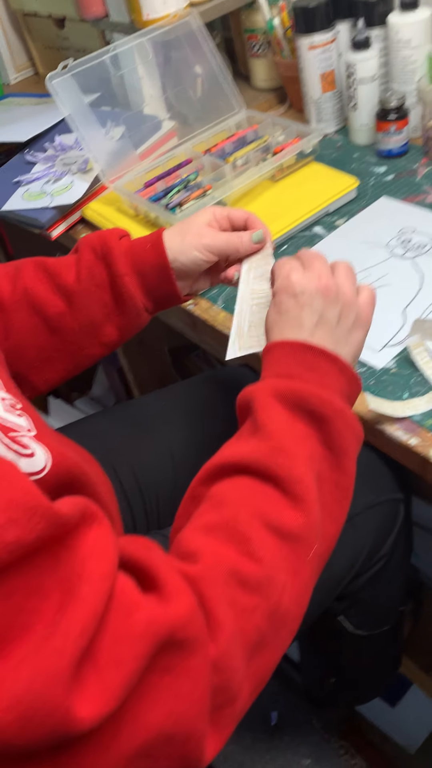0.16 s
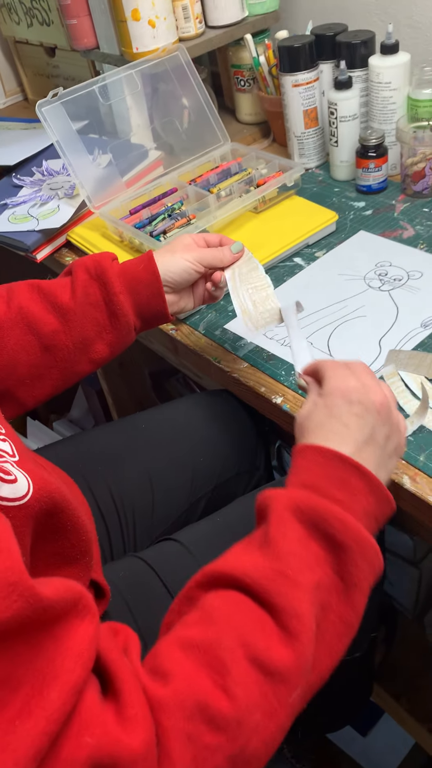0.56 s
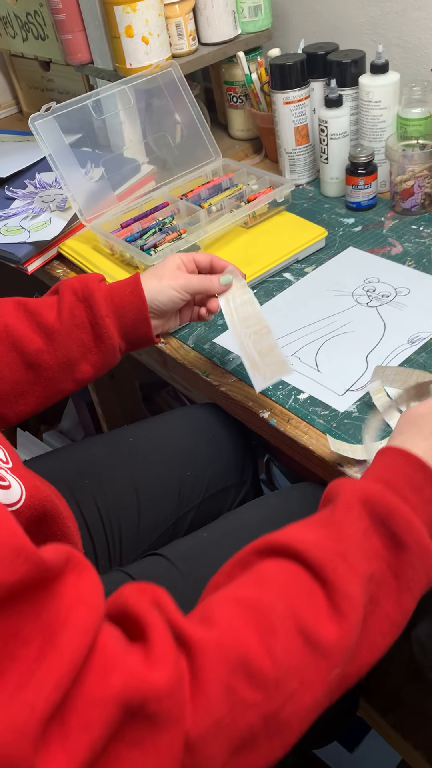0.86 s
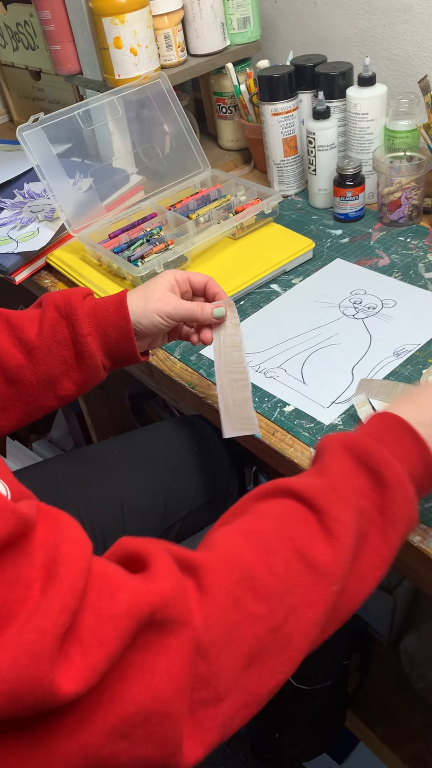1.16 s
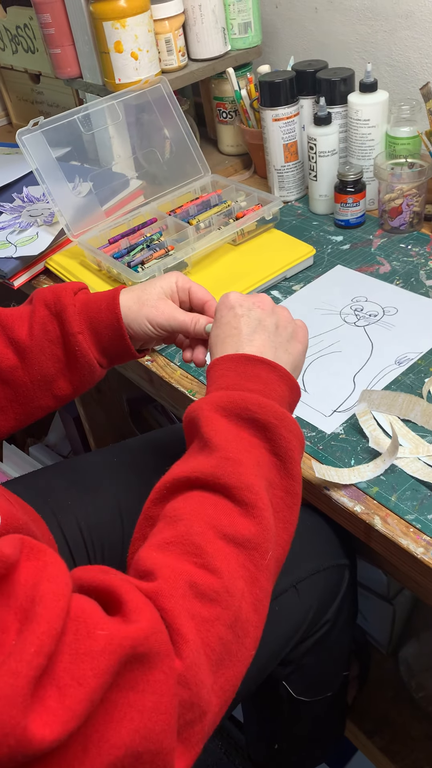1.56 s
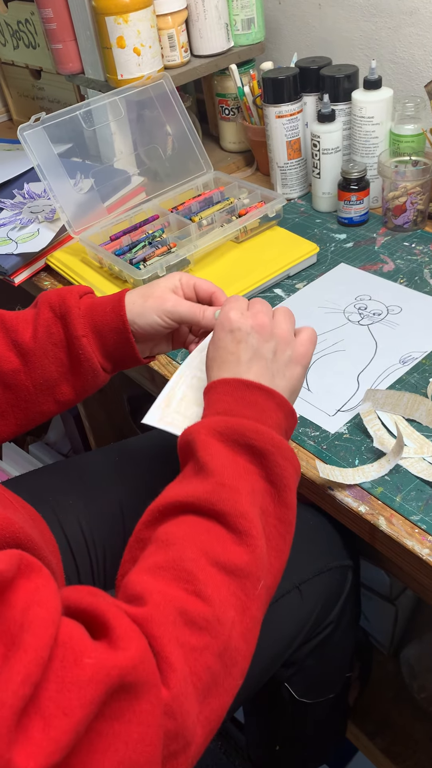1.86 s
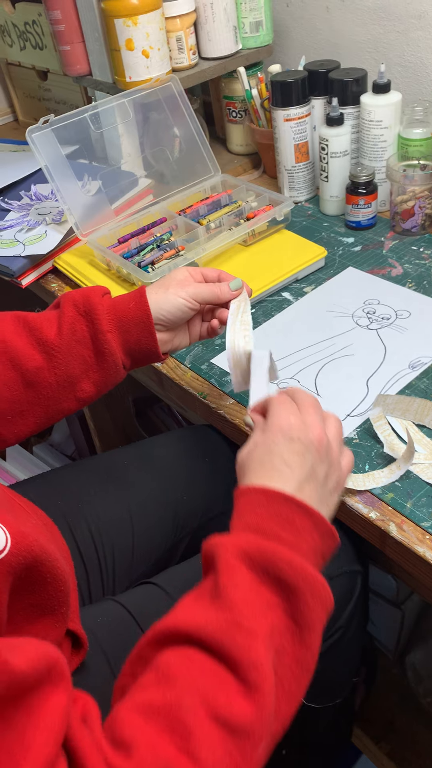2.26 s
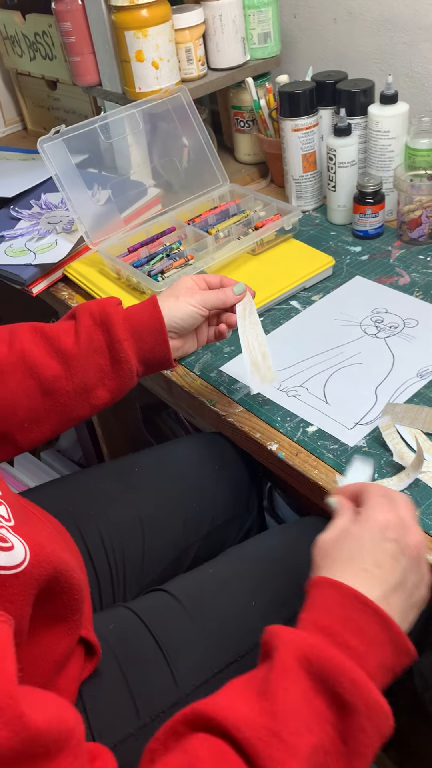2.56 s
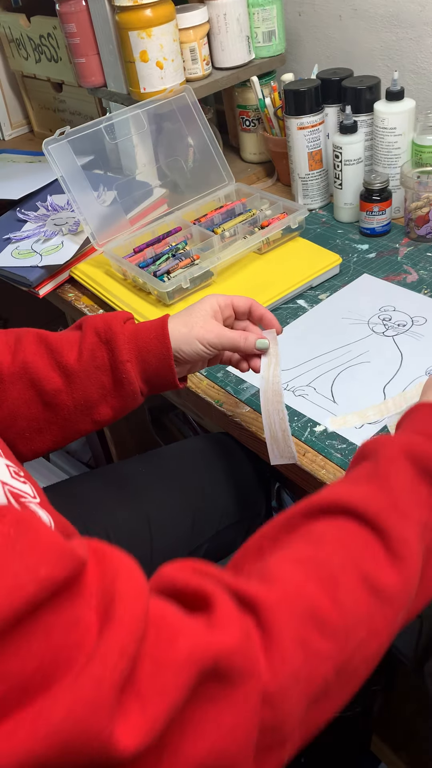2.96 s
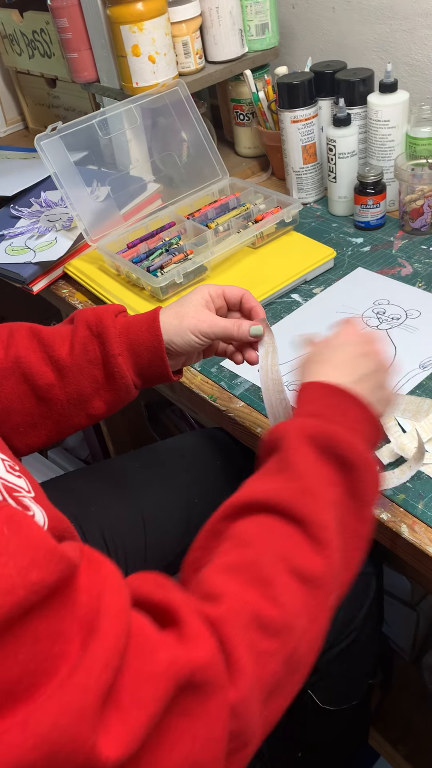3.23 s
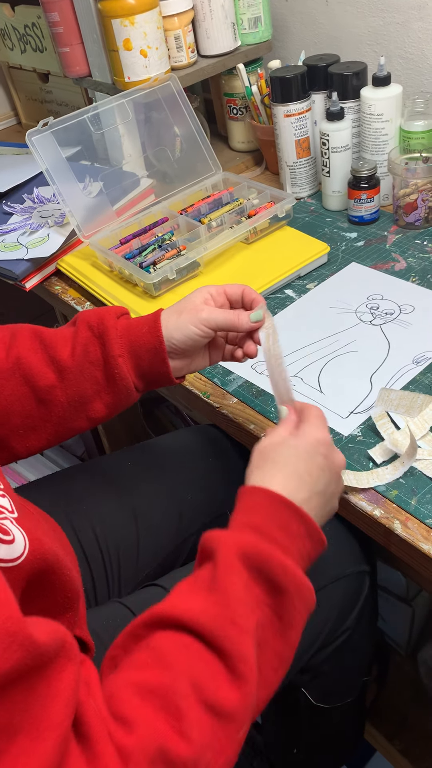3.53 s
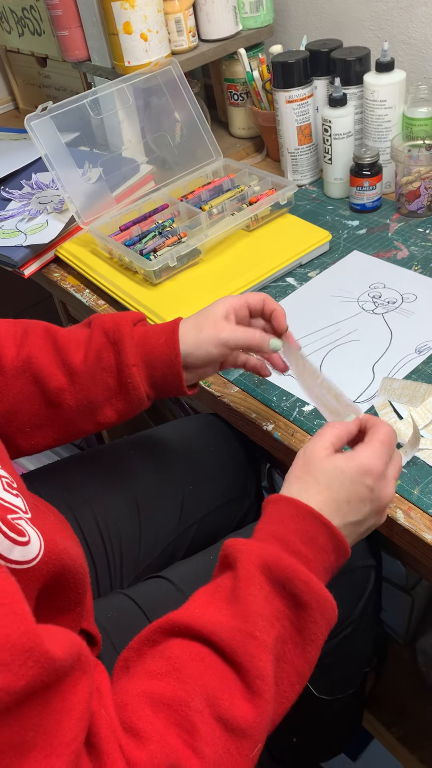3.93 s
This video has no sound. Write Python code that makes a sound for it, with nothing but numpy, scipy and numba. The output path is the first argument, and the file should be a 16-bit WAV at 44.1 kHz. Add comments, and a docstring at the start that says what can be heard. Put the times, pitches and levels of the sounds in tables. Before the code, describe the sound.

Paper is torn by hand into two long strips, two crisp crackling rips with soft rustling and faint handling between and after.

```python
"""Paper rips crisply, twice, as two long strips are torn by hand at a craft table in a small room.
Fibres snap in clumps (random clicks, coloured) along each tear and shake sheet and strip.
Between and after the tears, creases, soft bumps, sliding and rustling tell of strips being handled.
Sleeves brush about (banded noise) over a low hum (wavering sine), rumble and hiss (noise)."""
import sys
import numpy as np
from scipy import signal
from scipy.fft import rfft, irfft, next_fast_len
from scipy.io import wavfile
from scipy.ndimage import uniform_filter1d
from numba import njit

SR = 44100
rng = np.random.default_rng(int(sys.argv[2]) if len(sys.argv) > 2 else 0)


def dump(signal):
    """Clip the signal to [-1, 1] and save it as 16-bit WAV at the path in sys.argv[1]."""
    limited = np.clip(np.atleast_2d(signal).T, -1, 1)
    pcm = np.round(limited * 32767).astype(np.int16)
    wavfile.write(sys.argv[1], SR, pcm)


N = 180369
TIME = np.arange(N) / SR
SIZE = 2 * next_fast_len((N + SR) // 2, True)
HZ = np.maximum(np.arange(SIZE // 2 + 1) * SR / SIZE, 1)
CUTOFF_HZ = 15900


def from_db(db):
    """Decibels to gain."""
    return 10 ** (np.asarray(db) / 20)


def rms_one(x):
    """Scale to unit rms."""
    return x / np.sqrt(np.mean(x ** 2) + 1e-20)


def in_time(rows):
    """Each column of a curve at every sample."""
    s, *columns = np.transpose(rows)
    return [np.interp(TIME, s, c) for c in columns]


def at_hz(points):
    """A table joined by straight lines over log frequency."""
    hz, value = np.transpose(points)
    return np.interp(np.log(HZ), np.log(hz), value)


def colour(x, spectrum):
    """Causal (minimum-phase) filter with this spectrum; white noise keeps its rms."""
    cepstrum = irfft(np.log(rms_one(from_db(at_hz(spectrum)))), SIZE)
    cepstrum[1:SIZE // 2] *= 2
    cepstrum[SIZE // 2 + 1:] = 0
    return irfft(rfft(x, SIZE) * np.exp(rfft(cepstrum)), SIZE)[..., :N]


def highpass_or_lowpass(x, order, hz, kind):
    """Butterworth filter."""
    return signal.sosfilt(signal.butter(order, hz, kind, fs=SR, output="sos"), x)


def drift(rate_hz):
    """Smooth chance of unit rms with about rate_hz turns a second."""
    r = np.exp(-40 * np.pi * rate_hz / SR)  # runs at SR / 20
    noise = rng.standard_normal(N // 20 + 2002)
    slow = signal.lfilter([1], [1, -2 * r, r * r], noise)[2000:]
    return np.interp(np.arange(N) / 20, np.arange(len(slow)), rms_one(slow))


def steady(x):
    """Unit rms over every few hundredths of a second; finer grain stays."""
    return x / np.sqrt(np.maximum(uniform_filter1d(x ** 2, size=1500), 1e-9))


def crackle(per_s, spread_db):
    """Random clicks of either sign and exponentially spread dB level."""
    born = rng.random(N) < per_s / SR
    sizes = from_db(spread_db * np.minimum(rng.exponential(1, N), 4))
    return born * sizes * rng.choice([-1, 1], N)


def burst(start_s, t60_s):
    """An envelope that jumps to one and dies away."""
    start = round(start_s * SR)
    age_s = TIME[:N - start][:round(2 * t60_s * SR)]
    return np.pad(1000. ** (-age_s / t60_s), (start, N - start - len(age_s)))


STOP_S = 0.0044


def stroke(peak_s, rise_s, fall_s, edge_db):
    """Gain of one hand movement: swells from edge_db to full at its fastest moment and sinks back."""
    start, end = peak_s - rise_s, peak_s + fall_s
    moving = np.interp(TIME, [start - STOP_S, start, end, end + STOP_S], [0, 1, 1, 0])
    return moving * from_db(np.interp(TIME, [start, peak_s, end], [edge_db, 0, edge_db]))


def flex(x, depth_db, rate_hz, tilt_db=0, count=13):
    """Bending paper radiates ever different bands; tilt_db per octave leans the treble about 8.5 kHz."""
    centres = np.linspace(np.sqrt(200), np.sqrt(16000), count) ** 2
    spectrum, out = rfft(x, SIZE), 0
    for hz, only in zip(centres, np.eye(count)):
        band = irfft(spectrum * np.interp(HZ, centres, only), SIZE)[:N]
        octaves = np.log2(max(hz, 4000) / 8500) * (hz > 3300)
        out = out + band * from_db(depth_db * drift(rate_hz) + tilt_db * octaves)
    return out


@njit
def moving_band(x, tuning, width):
    """A resonance of unit gain whose centre moves; tuning is tan(pi Hz / SR)."""
    out, band, low = np.zeros(len(x)), 0., 0.
    for i in range(len(x)):
        out[i] = (band + tuning[i] * (x[i] - low)) / (1 + tuning[i] * (tuning[i] + width))
        band, low = 2 * out[i] - band, low + 2 * tuning[i] * out[i]
    return width * out


def lift_band(x, hz, width, lift_db):
    """Resonance gliding along hz raises its band; width is a share of the pitch."""
    tuning = np.tan(np.pi * np.minimum(hz, CUTOFF_HZ) / SR)
    return x + (from_db(lift_db) - 1) * moving_band(x + 1e-18, tuning, width)


# left-right likeness of diffuse sound: pitch_hz, likeness (-1 to 1, clipped)
LEFT_RIGHT_LIKENESS = [(50, 1), (200, 0.78), (450, 0.47), (900, -0.26), (2000, -0.064), (3400, -0.4),
                       (6000, 1), (13800, -1.2)]


def diffuse(pair):
    """Two unrelated signals become the spectra of sound arriving from all sides."""
    alike = np.clip(at_hz(LEFT_RIGHT_LIKENESS), -1, 1)
    mid, side = rfft(pair, SIZE)
    return (np.sqrt(1 + alike) * mid + np.sqrt(1 - alike) * side * [[1], [-1]]) / np.sqrt(2)


# shared course of hum and rumble: time_s, level_db
LOW_LEVEL = [(0.0, -50), (0.03, -53.5), (1.97, -64), (2.06, -57.5), (2.28, -65.5), (2.43, -57),
             (3.01, -58.5), (3.05, -62), (3.6, -61), (3.79, -69.5), (3.87, -56.5), (4.09, -61.5)]
# rumble spectrum: pitch_hz, relative_db
RUMBLE_SPECTRUM = [(15, -46), (30, -35.5), (46, 8), (58, -5), (72, 4.5), (95, -10), (160, -12.5),
                   (400, -35), (2000, -70.5)]
# room hiss spectrum: pitch_hz, relative_db
AIR_SPECTRUM = [(30, -16), (150, 1.5), (350, -2.5), (800, -9.5), (2000, -9), (4000, -22.5), (9000, -35.5),
                (16000, -32)]
HUM_HZ = 47.96


def background(hum_db=-4.0, rumble_db=-2.5, air_db=-72.0):
    """A phase-wavering low sine hum, with diffuse noise as rumble and faint room hiss."""
    level_db, = in_time(LOW_LEVEL)
    hum = np.sqrt(2) * np.sin(2 * np.pi * HUM_HZ * TIME + 0.4 * drift(4.1))
    rumble = from_db(level_db + rumble_db) * colour(rng.standard_normal((2, N)), RUMBLE_SPECTRUM)
    air = from_db(air_db) * colour(rng.standard_normal((2, N)), AIR_SPECTRUM)
    return from_db(level_db + hum_db) * hum + irfft(diffuse(rumble + air), SIZE)[:, :N]


# arm movements: fastest_s, speed_up_s, slow_down_s, level_db
ARM_STROKES = [(0.92, 0.035, 0.12, -62.5), (1.124, 0.043, 0.089, -60), (1.32, 0.14, 0.12, -57.5),
               (1.668, 0.023, 0.022, -62), (1.86, 0.059, 0.48, -62.5), (2.7, 0.022, 0.11, -60.5),
               (2.858, 0.028, 0.047, -61.5), (2.998, 0.027, 0.053, -61), (3.044, 0.0061, 0.029, -66),
               (3.105, 0.044, 0.091, -63), (3.25, 0.039, 0.036, -62), (3.325, 0.017, 0.035, -65.5),
               (3.46, 0.09, 0.11, -62.5), (3.799, 0.13, 0.32, -69)]
# cloth spectrum: pitch_hz, relative_db
SLEEVE_SPECTRUM = [(50, -9.5), (110, -34.5), (170, -0.5), (300, -3.5), (450, -6), (700, -3), (1000, -11.5),
                   (2500, -13.5), (10000, -42)]
ARM_EDGE_DB = -10  # at both ends of a movement


def sleeves(lumps_db=1.15, folds_db=3, count=7):
    """Cloth brushes on all sides; each fold swells in a low band of its own."""
    effort = sum(from_db(db) * stroke(s, rise, fall, ARM_EDGE_DB) for s, rise, fall, db in ARM_STROKES)
    brush = rfft(colour(rng.standard_normal((2, N)), SLEEVE_SPECTRUM), SIZE)
    centres = np.geomspace(130, 1100, count)
    cloth = 0
    for only in np.eye(count):
        fold = irfft(brush * np.interp(HZ, centres, only), SIZE)[:, :N]
        cloth = cloth + fold * from_db(folds_db * drift(22))
    return irfft(diffuse(cloth * effort * from_db(lumps_db * drift(14))), SIZE)[:, :N]


# soft bumps of hand and forearm: start_s, level_db
HAND_BUMPS = [(0.972, -48.5), (1.323, -55), (1.358, -52.5), (1.66, -61), (1.99, -54), (2.021, -62),
              (2.335, -50), (2.409, -51.5), (2.501, -57), (2.693, -45.5), (2.732, -52.5), (2.856, -62),
              (3.09, -61), (3.449, -58.5)]


def bumps(modes=((120, -13, .16), (163, 2, .17), (190, -1, .13), (240, -9, .09)), rise_s=0.0043):
    """Soft blows swell into the low modes of the table: pitch_hz, level_db, t60_s."""
    out = np.zeros(N)
    for s, db in HAND_BUMPS:
        start = round(s * SR)
        age_s = TIME[:N - start][:SR // 2]
        for hz, mode_db, t60_s in modes:
            gain = from_db(db + mode_db + rng.normal(0, 5.1))
            envelope = gain * burst(0, t60_s)[:len(age_s)] * (1 - np.exp(-age_s / rise_s))
            out[start:][:len(age_s)] += envelope * np.sin(2 * np.pi * (hz * age_s + rng.random()))
    return out


# paper drawn through the fingers: fastest_s, speed_up_s, slow_down_s, slide_db, rustle_db
FINGER_SLIDES = [(0.949, 0.098, 0.18, -73, -66), (1.27, 0.16, 0.14, -65, -62),
                 (1.79, 0.076, 0.052, -81, -72), (2.8, 0.066, 0.29, -73, -88),
                 (3.31, 0.027, 0.053, -73, -67.5), (3.41, 0.027, 0.19, -56, -93),
                 (3.586, 0.12, 0.14, -45.5, -55), (3.976, 0.044, 0.037, -55, -63)]
# paper creased or rubbed in the fingers: pitch_hz, relative_db
CREASE_SPECTRUM = [(1500, -33.5), (3300, -4), (4500, 0.5), (6000, 3), (8000, 5), (9500, 2.5), (11000, -0.5),
                   (14000, -4.5), (16000, -15)]
# rustling strip: pitch_hz, relative_db
RUSTLE_SPECTRUM = [(400, -5.5), (1200, -14.5), (1600, 2), (2700, 1), (4300, 4.5), (6000, 4.5),
                   (16000, -26.5)]
SLIDE_EDGE_DB, RUSTLE_FOLLOWS = -20, 0.36  # at both ends of a slide; share of that swing in the rustle


def handling(brighten=0.13, idle_db=-83, neutral_db=-72):
    """Fine-grained sliding, brighter when faster, and rustle; held paper is never quite still."""
    grain = steady(crackle(per_s=23000, spread_db=4.0) * from_db(0.83 * drift(41)))
    slide, rustle = from_db(idle_db), 0
    for s, rise, fall, slide_db, rustle_db in FINGER_SLIDES:
        slide = slide + from_db(slide_db) * stroke(s, rise, fall, SLIDE_EDGE_DB)
        rustle = rustle + from_db(rustle_db) * stroke(s, rise, fall, RUSTLE_FOLLOWS * SLIDE_EDGE_DB)
    paper = slide * colour(grain, CREASE_SPECTRUM) + rustle * colour(grain, RUSTLE_SPECTRUM)
    tilt_db = brighten * (20 * np.log10(slide) - neutral_db)
    return flex(paper, depth_db=3.5, rate_hz=12, tilt_db=tilt_db)


# strips buckling or touching the table: start_s, level_db, crispness_db, t60_s
STRIP_TOUCHES = [(0.761, -57, 5.5, 0.21), (0.919, -55, -20, 0.11), (1.175, -53.5, -2, 0.25),
                 (1.23, -54.5, -9, 0.15), (1.269, -66, 0, 0.39), (1.297, -58.5, -11, 0.32),
                 (1.319, -67, -16, 0.08), (1.352, -50, -9.5, 0.12), (1.513, -78, 6, 0.28),
                 (1.569, -69, 6, 0.28), (1.818, -58, -2.5, 0.28), (1.846, -64, 22, 0.049),
                 (1.876, -72, 27, 0.12), (2.563, -60.5, -1, 0.3), (2.683, -56.5, -13, 0.19),
                 (2.691, -50, -6.5, 0.26), (2.845, -51, -6.5, 0.27), (2.850, -47.5, -14, 0.058),
                 (2.974, -78.5, 14, 0.085), (3.039, -64, 1.5, 0.23), (3.173, -66, -7, 0.23),
                 (3.235, -60.5, -8.5, 0.24), (3.262, -73, 18.5, 0.15), (3.383, -77.5, 14, 0.14),
                 (3.428, -60, -8, 0.1)]
# dull part of a touch: pitch_hz, relative_db
TOUCH_SPECTRUM = [(100, 0.5), (300, 8), (500, -22), (980, 7.5), (1220, 12.5), (1500, 7), (2500, 7),
                  (3400, 9), (4300, 10), (6000, -1.5), (10000, -32.5), (16000, -87)]


def touches(rise_hz=110, uneven_db=1.0):
    """A strip lands or buckles: an uneven flurry of creases, dull on the table, crisp in the fingers."""
    creases = steady(crackle(per_s=1800, spread_db=-1.5) * from_db(uneven_db * drift(110)))
    dull = sum(from_db(db) * burst(s, t60_s) for s, db, _, t60_s in STRIP_TOUCHES)
    crisp = sum(from_db(db + crisp_db) * burst(s, t60_s) for s, db, crisp_db, t60_s in STRIP_TOUCHES)
    # limp paper takes a moment to make full contact
    dull, crisp = highpass_or_lowpass(np.array([dull, crisp]) + 1e-18, 1, rise_hz, "low")
    return colour(dull * creases, TOUCH_SPECTRUM) + colour(crisp * creases, CREASE_SPECTRUM)


# thick fibre bundles giving way: start_s, level_db, ring_hz
BUNDLE_SNAPS = [(0.0402, -15, 8000), (0.0473, -11.5, 7800), (0.0566, -13.5, 7900), (0.0872, -12, 8500),
                (0.1361, -13.5, 8500), (0.1825, -12.5, 9400), (0.1948, -15, 9400), (0.204, -12.5, 9600),
                (0.2126, -11.5, 7800), (0.2224, -6, 8800), (0.2277, -7.5, 7800), (0.245, -15, 8500),
                (0.2602, -10, 8000), (0.2627, -12.5, 8600), (0.2726, -9, 6900), (0.3025, -19.5, 8500),
                (0.4459, -20.5, 7200), (0.5067, -23, 8200), (0.5234, -14.5, 9400), (0.585, -24, 8200),
                (0.745, -12, 8000), (0.756, -17.5, 9900), (1.900, -18, 7500), (1.9225, -12, 6500),
                (1.939, -19, 6500), (1.9588, -15, 7500), (1.966, -9.5, 7500), (1.9762, -12.5, 7500),
                (1.9877, -3.5, 7200), (2.2113, -23, 9800), (2.22, -21, 9300), (2.244, -16, 9300),
                (2.2693, -31, 9000), (2.336, -24, 9200), (2.3935, -14, 9000), (2.4365, -10, 9800),
                (2.4738, -14, 8200), (2.499, -18, 8500), (2.5225, -12.5, 8500), (2.558, -23, 8500)]
# breaking fibres: pitch_hz, relative_db
FIBRE_SPECTRUM = [(1500, -28.5), (3300, -8.5), (4500, 3), (6000, 2.5), (8000, -0.5), (9500, 0.5),
                  (11000, 0.5), (12300, -1), (14000, -4.5), (16000, -14)]


def snaps(t60_s=0.0038, tail_db=-16, crack_db=-1, thin_hz=4500, ring_db=-12.0, ring_t60_s=0.0049):
    """A fibre bundle breaks: a sharp crack, its last threads, and a brief ring of the paper beside it."""
    threads = sum(from_db(db + tail_db) * burst(s, t60_s) for s, db, _ in BUNDLE_SNAPS)
    force = threads * rng.choice([-1, 1], N)
    rings, age_s = np.zeros(N), TIME[:SR // 20]
    for s, db, hz in BUNDLE_SNAPS:
        start = round(s * SR)
        force[start] = from_db(db + crack_db)
        decay = from_db(db + ring_db) * 1000. ** (-age_s / ring_t60_s)
        rings[start:][:len(age_s)] += decay * np.cos(2 * np.pi * hz * age_s)
    return highpass_or_lowpass(colour(force, FIBRE_SPECTRUM) + rings, 2, thin_hz, "high")


def ticks(low_hz, high_hz, per_s, t60_s, spread_db=2.5, count=24):
    """Stiff fibres flick the paper, each ringing a small patch at one of count pitches; rms 1."""
    clicks, dealt, out = crackle(per_s, spread_db), rng.integers(0, count, N), 0
    r = from_db(-60 / (t60_s * SR))
    for k, hz in enumerate(np.geomspace(low_hz, high_hz, count)):
        cos = np.cos(2 * np.pi * hz / SR)
        struck = clicks * (dealt == k) + 1e-18
        out = out + signal.lfilter([1, -r * cos], [1, -2 * r * cos, r * r], struck)
    return rms_one(out)


SINK_OCTAVES_PER_S, MODE_WIDTH = 1.54, 0.13  # width as a share of the pitch


def lengthening(x, tear, modes):
    """The strip grows as the tear runs, so all its resonances glide down together."""
    gives_s, parts_s = tear[1:3]
    sink = 2 ** (-SINK_OCTAVES_PER_S * (np.clip(TIME, gives_s, parts_s) - gives_s))
    for hz, lift_db in modes:
        x = lift_band(x, hz * sink, MODE_WIDTH, lift_db)
    return x


GRIP_DB, TAPER_DB, RELEASE_S = -5.5, -9.5, 0.019  # quieter before the edge gives way and at the end
JOLT_DB, JOLT_T60_S = 5, 0.035  # the sheet jerks when the edge gives way
HELD_STRIP_DB, FREEING_S = -10, 0.0077  # the strip flutters fully only once it hangs free
# tautest soon after the edge gives way: crackle brightest (dB per octave), sheet and strip shake less
TAUT_AFTER_S, TAUT_WIDTH_S, TAUT_LIFT_DB, TAUT_SHAKE_DB = 0.18, 0.045, 3, -2
FLAP_DB, FLAP_WIDTH_S = 1.5, 0.053  # the hanging strip swings out once in each tear


def tear_course(tear, pull):
    """Gains of fibres, sheet and strip, and treble lift, as a tear is gripped, gives way, runs, tapers."""
    grip_s, gives_s, parts_s, taper_s, sheet_db, growth_db_per_s, strip_db, flaps_s, lift_db = tear

    def held_from(start_s):
        edges_s = [start_s - RELEASE_S, start_s, parts_s, parts_s + RELEASE_S]
        return np.interp(TIME, edges_s, [0, 1, 1, 0])

    pulled, gripped = held_from(pull[0][0]), held_from(grip_s)
    taut = np.exp(-((TIME - gives_s - TAUT_AFTER_S) / TAUT_WIDTH_S) ** 2)
    course_s = [grip_s, gives_s, parts_s - taper_s, parts_s]
    shake_db = np.interp(TIME, course_s, [GRIP_DB, 0, 0, TAPER_DB]) + TAUT_SHAKE_DB * taut
    free = np.interp(TIME, [gives_s - FREEING_S, gives_s], [0, 1])
    run_s = np.clip(TIME, gives_s, parts_s) - gives_s
    fibre = from_db(in_time(pull)[0])
    jolt = 1 + from_db(JOLT_DB) * burst(gives_s, JOLT_T60_S)
    sheet = from_db(sheet_db + shake_db + growth_db_per_s * run_s) * jolt
    flap = np.exp(-((TIME - flaps_s) / FLAP_WIDTH_S) ** 2)
    strip = from_db(strip_db + shake_db + HELD_STRIP_DB * (1 - free) + FLAP_DB * flap)
    treble_db = lift_db * free + TAUT_LIFT_DB * taut
    return np.array([pulled * fibre, gripped * sheet, gripped * strip, gripped * treble_db])


# tears: grip_s, edge_gives_s, strip_parts_s, taper_s, sheet_db, sheet_growth_db_per_s, strip_db,
# flap_s, treble_lift_db_per_octave
TEAR_RUNS = [(0.022, 0.039, 0.7506, 0.2, -42.5, 3.5, -47.5, 0.65, 2),
             (1.891, 1.989, 2.564, 0.13, -41.5, -2, -49.5, 2.24, 4.5)]
# hand pull as fibre crackle, one list per tear: time_s, level_db
HAND_PULLS = [
    [(0.0, -44), (0.022, -48), (0.041, -30.5), (0.12, -33.5), (0.234, -29), (0.322, -31.5), (0.62, -32),
     (0.722, -38.5), (0.757, -42)],
    [(1.87, -57), (1.898, -44.5), (1.974, -29), (1.983, -39), (1.996, -35), (2.114, -38.5), (2.234, -32),
     (2.444, -31.5), (2.528, -36), (2.556, -45)],
]
# strip resonances as the edge gives way, one list per tear: pitch_hz, lift_db
STRIP_RESONANCES = [
    [(420, -0.5), (2000, 3.5), (2700, 2.5), (4700, 5.5), (8300, 3), (10900, 2.5), (15800, -1)],
    [(490, 6.5), (2000, -1), (3200, 0.5), (6900, 0), (12000, 1.5), (14300, 1)],
]
# slow tears catch coarsely, fast ones run evenly: time_s, roughness (0-1)
TEAR_ROUGHNESS = [(0.28, 0.8), (0.4, 0.55), (0.75, 0.5), (1.89, 0.85), (1.985, 1), (2.03, 0.3), (2.56, 0.8)]
# centre of the fibre crackle, rising as the paper tightens: time_s, pitch_hz
FIBRE_PITCH = [(0.05, 7900), (0.2, 9300), (0.3, 8150), (0.45, 7430), (0.55, 8750), (0.74, 8200),
               (1.88, 6420), (1.98, 7400), (2.05, 7600), (2.13, 10360), (2.22, 9800), (2.32, 8430),
               (2.53, 8900)]
# shaken sheet: pitch_hz, relative_db
SHEET_SPECTRUM = [(400, -26), (900, -24.5), (1300, -9.5), (1650, -1.5), (2100, -0.5), (2650, 2.5),
                  (3400, 3), (4300, 7.5), (6000, 3), (10000, -15.5), (16000, -21)]
# fluttering strip: pitch_hz, relative_db
STRIP_SPECTRUM = [(60, -28.5), (120, -14.5), (170, -9.5), (230, -5), (310, -13.5), (365, 2), (440, -3),
                  (520, 0), (690, 5), (880, -1.5), (1200, -3.5), (3000, -45), (10000, -64.5)]
CRACKLE_LIFT_DB, CRACKLE_WIDTH = 5, 0.31  # width as a share of the pitch


def tears(clump_db=-0.8, slip_db=-0.5, spread_db=-1.0, hiss_db=-11, fibre_db=0.0, sheet_db=3.5,
          strip_db=-1.5, fibre_ticks_db=-7, sheet_ticks_db=-7):
    """The tear sticks and slips, so fibres break in clumps; each break also shakes sheet and strip."""
    rough = np.clip(in_time(TEAR_ROUGHNESS)[0], 0, 1)
    clumps = from_db(rough * (clump_db * drift(280) + slip_db * drift(20)))
    clicks = steady(crackle(per_s=3400, spread_db=rough * spread_db))
    breaks = clumps * (clicks + from_db(hiss_db) * rng.standard_normal(N))
    # the sheet also creases on its own
    shaking = breaks + clumps * rms_one(crackle(per_s=7000, spread_db=3.0))
    fibre = colour(breaks, FIBRE_SPECTRUM)
    fibre = steady(lift_band(fibre, in_time(FIBRE_PITCH)[0], CRACKLE_WIDTH, CRACKLE_LIFT_DB))
    sheet = steady(colour(shaking, SHEET_SPECTRUM))
    strip = steady(colour(shaking, STRIP_SPECTRUM))
    fibre = steady(fibre + from_db(fibre_ticks_db) * ticks(5800, 11300, per_s=170, t60_s=0.016))
    sheet = steady(sheet + from_db(sheet_ticks_db) * ticks(1400, 4400, per_s=130, t60_s=0.025))
    out, tilt_db = 0, 0
    for tear, effort, modes in zip(TEAR_RUNS, HAND_PULLS, STRIP_RESONANCES):
        pull, rasp, flutter, taut_db = tear_course(tear, effort)
        rip = from_db(fibre_db) * pull * fibre
        rip = rip + from_db(sheet_db) * rasp * sheet
        rip = rip + from_db(strip_db) * flutter * strip
        out = out + lengthening(rip, tear, modes)
        tilt_db = tilt_db + taut_db
    # taut paper moves the crackle upward in pitch
    return flex(out, depth_db=2.5, rate_hz=26.0, tilt_db=tilt_db, count=32)


# direct sound at two spaced ports: pitch_hz, left_lead_rad
PORT_LEAD = [(20, 0), (800, -.4), (2000, .2), (3000, 0), (4200, 2), (5100, 3.1), (6500, 4.8), (8200, 6.2),
             (10200, 7.5), (12400, 9.4), (14200, 11), (15800, 12.6)]
# room sound against direct sound: pitch_hz, level_db
ROOM_TO_DIRECT = [(100, -0.5), (600, -5.5), (1200, -2), (2000, -8), (2700, -5), (3600, 2.5), (4800, -12.5),
                  (8000, -10), (16000, -15.5)]
ROOM_T60_S = 0.17


def room(x, early_db=8, early_t60_s=0.038, sway_hz=2.307):
    """Direct sound at two ports, quick reflections and a short tail, swaying between two echo patterns."""
    decay = burst(0.0041, ROOM_T60_S) + from_db(early_db) * burst(0.00047, early_t60_s)
    decay = decay / np.sqrt(np.sum(decay ** 2))
    sway = 2 * np.pi * sway_hz * TIME
    echoes = 0
    for share in (np.cos(sway), np.sin(sway)):
        echoes = echoes + rfft(x * share, SIZE) * diffuse(rng.standard_normal((2, N)) * decay)
    direct = rfft(x, SIZE) * np.exp(-1j * at_hz(PORT_LEAD) * [[0], [1]])
    wet = from_db(at_hz(ROOM_TO_DIRECT))
    return irfft((direct + wet * echoes) / np.sqrt(1 + wet ** 2), SIZE)[:, :N]


def scene():
    """All the paper sounds and bumps in the room, over sleeves and background."""
    return room(tears() + snaps() + touches() + bumps() + handling()) + sleeves() + background()


def record(dry):
    """A steep elliptic low-pass cuts the top."""
    return signal.sosfilt(signal.ellip(10, .2, 80, CUTOFF_HZ, fs=SR, output="sos"), dry)


dry = scene()
out = record(dry)
dump(out)
```